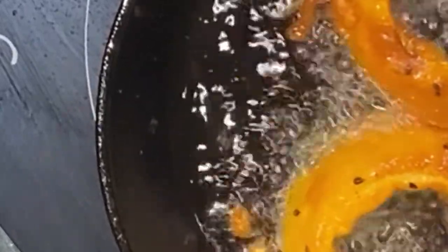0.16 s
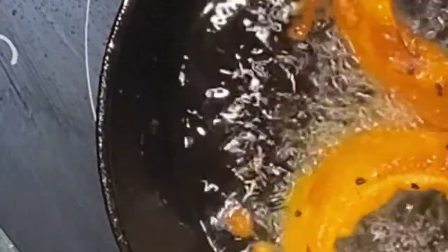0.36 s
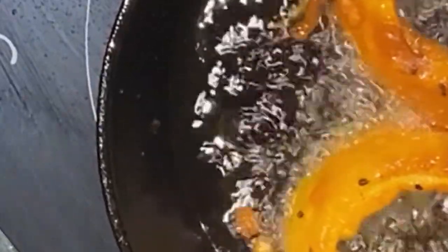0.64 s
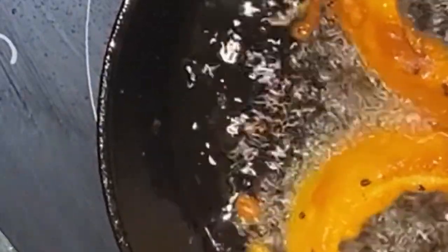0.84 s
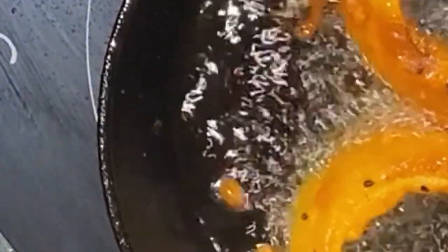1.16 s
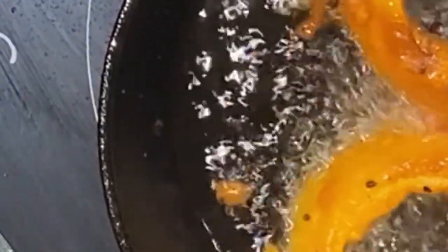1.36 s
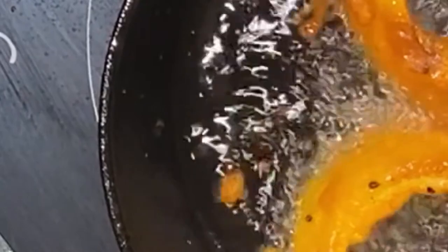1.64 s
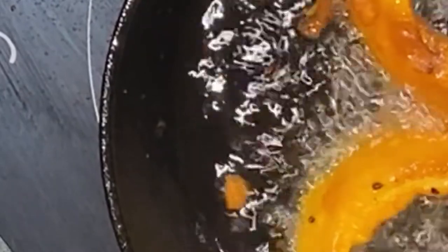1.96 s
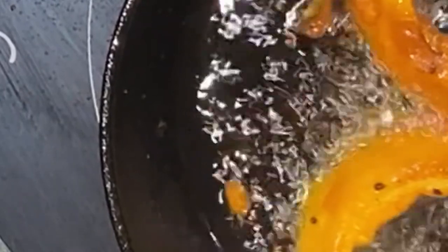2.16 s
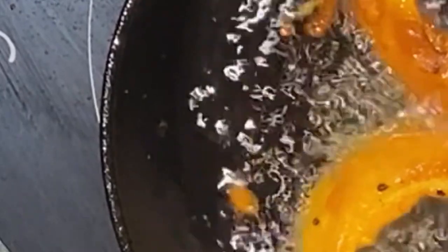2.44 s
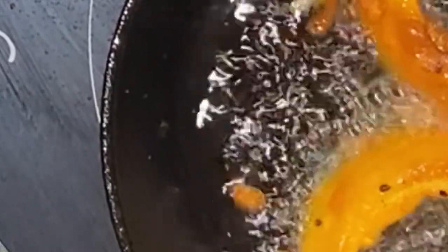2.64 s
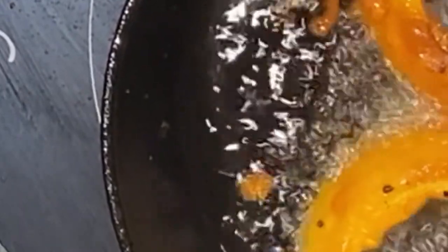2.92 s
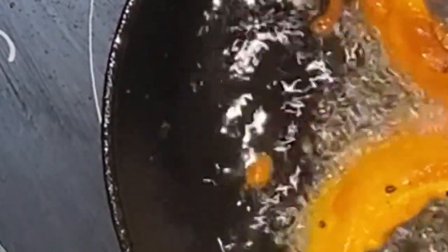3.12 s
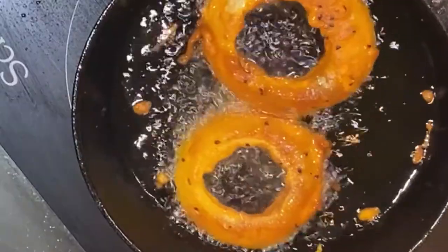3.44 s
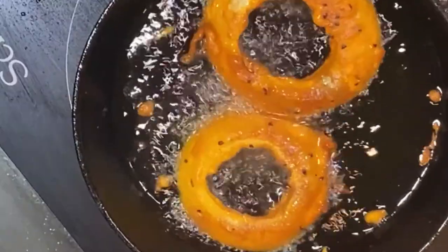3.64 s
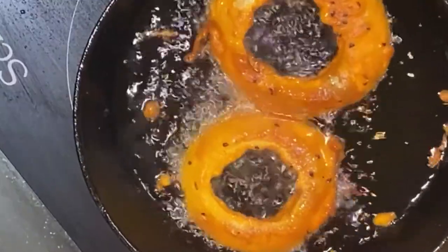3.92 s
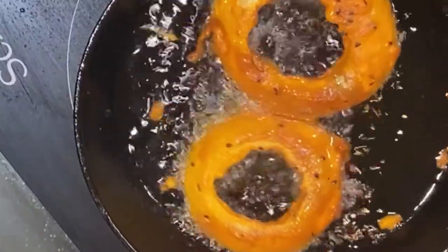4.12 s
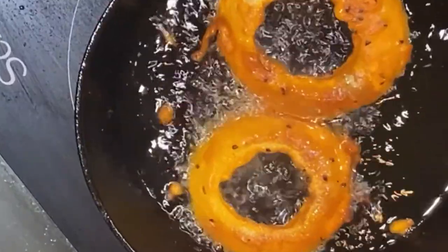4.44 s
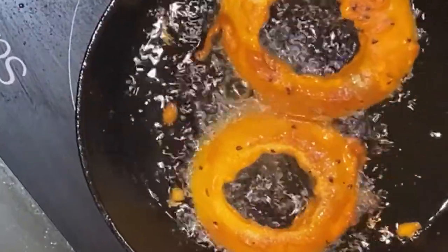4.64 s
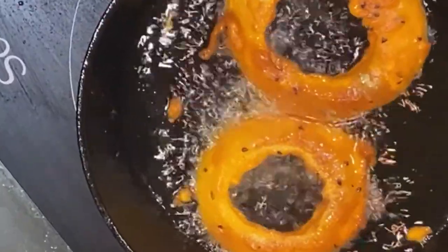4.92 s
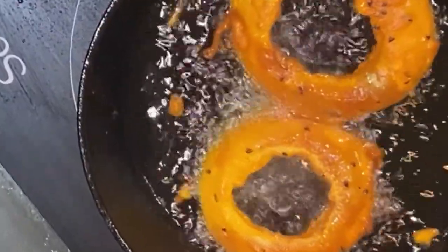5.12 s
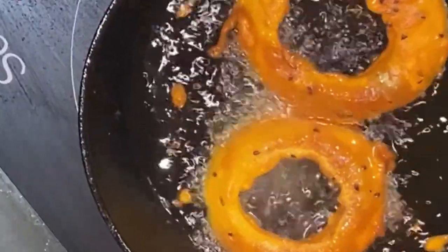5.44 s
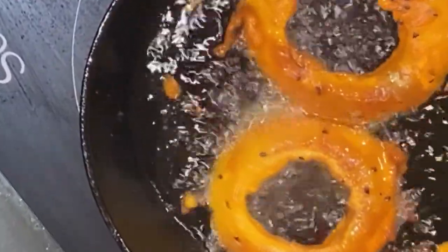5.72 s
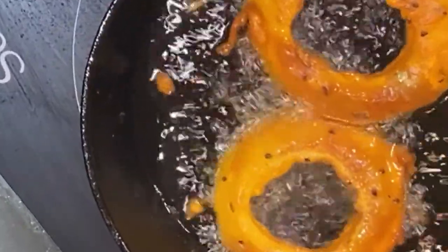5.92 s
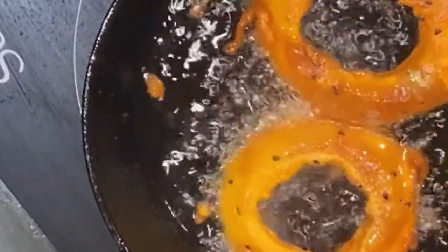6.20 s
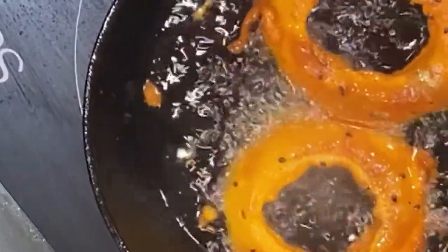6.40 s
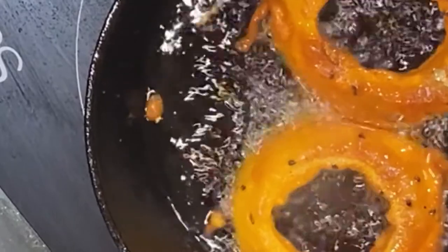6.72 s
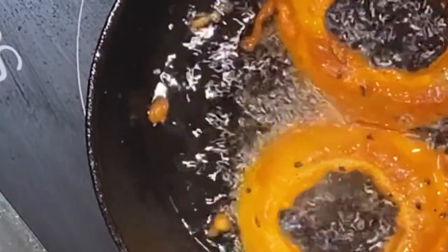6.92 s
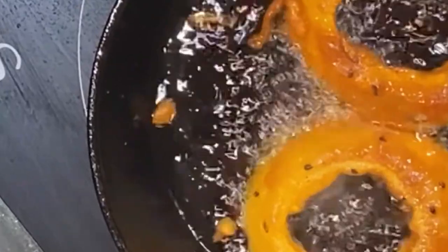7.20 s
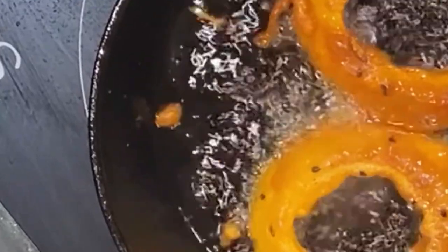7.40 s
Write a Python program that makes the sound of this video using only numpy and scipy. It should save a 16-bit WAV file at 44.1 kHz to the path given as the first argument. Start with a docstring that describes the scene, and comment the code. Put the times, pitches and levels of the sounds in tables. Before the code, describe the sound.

Close-up frying: wet bubble pops and droplet ticks over thin fizz, a violent burst of steam near five seconds, then a lull and thicker sizzle.

```python
"""Battered onion rings frying

Battered onion rings fry in a shallow pan of hot oil, close to a single microphone.
Resonators driven by random clicks and noise make the steam fizz, bubble snaps and short rough tones.
Larger bubbles pop as decaying sines, flung droplets tick as short noise bursts, a small metal utensil
clinks as a set of ringing modes; filtered noise makes the air puffs and, with a sine, the kitchen hum."""
import sys
import numpy as np
from scipy import signal
from scipy.fft import rfft, irfft, next_fast_len
from scipy.io import wavfile

SR = 44100
rng = np.random.default_rng(int(sys.argv[2]) if len(sys.argv) > 2 else 0)


def wrap_up_sound(samples):
    """Save the sound to the file named by the first command line argument, as 16-bit audio."""
    columns = np.atleast_2d(samples).T
    # keep every value between -1 and 1, then stretch to whole-number steps
    tamed = np.clip(columns, -1, 1)
    steps = np.round(tamed * 32767).astype(np.int16)
    wavfile.write(sys.argv[1], SR, steps)


N = 333351

# how steam leaves the batter: (time [s], smooth hiss relative to separate bubbles [dB])
HISS = [(0, -3.5), (3.3, -1), (3.7, 8.5), (4.9, 8), (7.56, 5)]


def from_db(db):
    """Amplitude gain of a level in dB."""
    return 10 ** (np.asarray(db) / 20)


def rms_one(x):
    """Scale to unit rms."""
    return x / np.sqrt(np.mean(x ** 2) + 1e-20)


def hiss_level_db():
    """Hiss relative to separate bubbles, one value per sample."""
    time_s, level_db = np.transpose(HISS)
    return np.interp(np.arange(N) / SR, time_s, level_db)


def at_hz(points, hz):
    """Read a spectrum in dB on a log-frequency axis."""
    point_hz, point_db = np.transpose(points)
    return np.interp(np.log(hz), np.log(point_hz), point_db)


def drift(rate_hz):
    """Slow random wander of unit rms: noise through two equal poles."""
    step = 40   # samples per slow value
    r = np.exp(-2 * np.pi * rate_hz * step / SR)
    noise = rng.standard_normal(N // step + 2002)
    slow = signal.lfilter([1], [1, -2 * r, r * r], noise)[2000:]   # settled part
    return np.interp(np.arange(N) / step, np.arange(len(slow)), rms_one(slow))


def ring(clicks, hz, t60_s):
    """Two-pole resonator: a unit click starts a decaying sine of initial height 1."""
    r = np.exp(-np.log(1000) / (t60_s * SR))
    w = 2 * np.pi * min(hz, SR * .45) / SR
    return signal.lfilter([0, np.sin(w)], [1, -2 * r * np.cos(w), r * r], clicks + 1e-18)


def band_filter(low_hz, high_hz):
    """Second-order Butterworth band-pass design."""
    return signal.butter(2, [low_hz, high_hz], "band", fs=SR, output="sos")


def add(out, start_s, peak_db, sound):
    """Mix a short sound into the track at the given peak."""
    i = round(start_s * SR)
    out[i:i + len(sound)] += (from_db(peak_db) * sound / np.abs(sound).max())[:N - i]


def coloured_noise(spectrum):
    """Steady noise of a given spectrum, unit rms."""
    size = next_fast_len(N)
    hz = np.maximum(np.arange(size // 2 + 1) * SR / size, 1)
    bins = rfft(rng.standard_normal(size)) * from_db(at_hz(spectrum, hz))
    return rms_one(irfft(bins, size)[:N])


def spurts():
    """Steam spurts rise, hold and fall in dB, summed in power: mid, deep, spray and puff control levels [dB]."""
    # (start [s], control level [dB], rise [s], hold [s], deep bubbles relative to level [dB],
    #  fine spray relative to level [dB], air puff control level [dB])
    spurt_rows = [(0.044,-47.5,0.0071,0.083,-19,-4.5,-52.5), (0.195,-43,0.02,0.057,4,-0.5,-51),
                  (.345,-52.5,0.0056,0.22,0,2,-58.5), (0.441,-43.5,0.015,0.032,2,4,-67),
                  (.585,-47.5,0.029,0.019,-1,-2.5,-76), (0.729,-46.5,0.012,0.092,-6,2,-62),
                  (.854,-43.5,0.013,0.0082,-6,-10,-68), (0.918,-43.5,0.041,0.011,1,4,-53),
                  (1.055,-47,0.0078,0.066,2,0,-67), (1.101,-38,0.048,0.0094,3,-1.5,-57),
                  (1.235,-47,0.017,0.1,1,-1,-61), (1.425,-45.5,0.035,0.012,5,2,-59),
                  (1.5,-37.5,0.25,0.011,-35,-6.5,-63), (1.834,-50,0.0099,0.034,-9,6.5,-62),
                  (2.01,-56.5,0.027,0.039,10,9.5,-63), (2.131,-45.5,0.01,0.0064,5.5,1.5,-65),
                  (2.24,-48.5,0.11,0.0076,5,1,-67), (2.373,-35.5,0.0082,0.031,4,-11,-46),
                  (2.45,-45.5,0.058,0.016,3,2.5,-52), (2.638,-45.5,0.02,0.056,0,-0.5,-66),
                  (2.77,-50,0.019,0.09,3,5,-56.5), (2.91,-52.5,.017,0.026,3,2.5,-57),
                  (2.976,-46,0.01,0.1,-6,5.5,-59), (3.1,-48.5,0.022,0.12,2,0.5,-59),
                  (3.385,-45,0.035,0.0082,7,0.5,-75), (3.564,-42.5,0.0029,0.014,6.5,-13,-75),
                  (3.666,-21,0.048,0.012,2,-19,-50), (3.768,-26,0.042,0.12,1.5,-14,-46),
                  (4.195,-56,0.014,.093,3,-2,-59.5), (4.291,-38.5,.011,0.0055,8,0,-50),
                  (4.35,-47,0.022,0.11,1,-1,-60), (4.5,-46,0.024,0.043,6,-6,-73),
                  (4.625,-45.5,0.0084,0.039,-4,-9,-77), (4.767,-25.5,0.042,0.14,-6.5,-11,-49.5),
                  (4.888,-11,0.019,0.069,-20,-2.5,-37), (5.162,-45,0.012,0.0092,7.5,-2.5,-52),
                  (5.349,-55,0.022,0.024,-24,-35,-78), (5.492,-63,0.038,0.028,-6,3,-75),
                  (5.626,-49.5,0.0053,0.005,-8,-4,-69), (5.69,-51,0.0091,0.074,3,-8,-61),
                  (5.82,-30.5,0.026,0.013,1,-7.5,-39), (6.024,-41,0.0063,0.061,-2,-6,-49),
                  (6.17,-51,0.018,0.031,5,-3.5,-56), (6.297,-39.5,0.0087,0.046,10,-2.5,-43),
                  (6.42,-43,0.045,0.027,4,1.5,-49.5), (6.55,-47.5,0.011,0.031,8,-1.5,-51.5),
                  (6.808,-42,0.0022,0.044,10,-11.5,-52.5), (6.898,-35.5,0.12,0.011,-10,3.5,-36.5),
                  (6.962,-32,0.06,0.066,7,1,-39), (7.1,-35,0.02,0.081,-2,2.5,-39.5),
                  (7.23,-41.5,0.0093,0.16,2,1,-47), (7.389,-43,0.038,0.055,4,3,-54)]
    simmer_db, still_air_db = -63, -64   # between spurts
    rise_db = 14.5   # climb during the rise
    fall_db_per_s, fall_gain_per_s, calm_db = 173.5, 2.76, -44   # faster per dB above calm
    spray_falls = 1.215   # fine spray dies this much faster
    power = np.ones((4, N)) * from_db([[simmer_db], [simmer_db], [simmer_db], [still_air_db]]) ** 2
    t = np.arange(SR) / SR
    for start_s, db, rise_s, hold_s, deep_db, spray_db, puff_db in spurt_rows:
        fall = max(fall_db_per_s + fall_gain_per_s * (db - calm_db), 50)
        falls = fall * np.array([[1], [1], [spray_falls], [1]])
        climb_db = -rise_db * np.maximum(1 - t / max(rise_s, .001), 0)
        shape = from_db(climb_db - falls * np.maximum(t - rise_s - hold_s, 0))
        tops = from_db([[db], [db + deep_db], [db + spray_db], [puff_db]])
        i = round(start_s * SR)
        power[:, i:i + SR] += (tops * shape)[:, :N - i] ** 2
    return 10 * np.log10(power)


def fizz(level_db, deep_db, spray_db, count=36):
    """Tiny bubbles burst at random over steam hiss; cascaded resonators swell and die within a few cycles."""
    fizz_spectrum = [(300, -60.5), (624, -2), (885, 0.5), (1340, -1), (2930, 0), (5610, 0), (10000, -7.5),
                     (16000, -25.5)]   # bubble sizes: (frequency [Hz], relative density [dB per Hz])
    bubbles_per_s, size_spread_db = 9000, 4   # nominal rate, all sizes together
    bubble_cycles = 5.6   # t60 of each resonator
    deep_hz, mid_hz, spray_hz = 600, 1870, 6360   # where each control acts fully
    hiss = from_db(hiss_level_db())
    sizes = from_db(size_spread_db * np.minimum(rng.exponential(1, N), 4)) * rng.choice([-1, 1], N)
    chance_of_burst = bubbles_per_s * from_db(3.0 * drift(40)) / SR
    bursts = sizes * (rng.random(N) < chance_of_burst)
    dealt, out = rng.integers(0, count, N), np.zeros(N)
    steam = rng.standard_normal((3, N))   # neighbouring sizes hear unrelated steam
    pitches = np.geomspace(300, 15000, count)
    weights = from_db(at_hz(fizz_spectrum, pitches)) * np.sqrt(pitches)   # wider bands carry more power
    weights /= np.linalg.norm(weights)
    for k, (hz, weight) in enumerate(zip(pitches, weights)):
        deep = np.interp(np.log(hz), np.log([deep_hz, mid_hz]), [1, 0])
        spray = np.interp(np.log(hz), np.log([mid_hz, spray_hz]), [0, 1])
        tilt_db = deep * (deep_db - level_db) + spray * (spray_db - level_db)
        drive = (rms_one(bursts * (dealt == k)) + hiss * steam[k % 3]) / np.sqrt(1 + hiss ** 2)
        t60_s = bubble_cycles / hz
        out += weight * from_db(tilt_db) * rms_one(ring(ring(drive, hz, t60_s), hz, t60_s))
    out = signal.sosfilt(signal.butter(3, 330, "high", fs=SR, output="sos"), out)
    wander_db = 4.44 * drift(47) / np.sqrt(1 + hiss ** 2)   # smaller under strong hiss
    return from_db(level_db - 4.0 + wander_db) * out


def snaps(level_db, per_s=350, snap_db=-6, spread_db=9.5, duller_db=1.0):
    """Middling bubbles snap singly, quieter as hiss grows; each rings all pool pitches at random strengths."""
    snap_hz = [2620, 3500, 4370, 5500, 6460]   # ringing pitches of the oil pool: (frequency [Hz])
    snap_cycles = 20   # t60
    born = np.flatnonzero(rng.random(N) < per_s / SR)
    size_db = 12.0 * np.minimum(rng.exponential(1, len(born)), 2.0)
    rings = np.zeros(N)
    for k, hz in enumerate(snap_hz):
        strength_db = size_db + spread_db * rng.standard_normal(len(born)) - duller_db * k
        clicks = np.zeros(N)
        clicks[born] = from_db(strength_db) * (-1) ** k
        rings += ring(clicks, hz, snap_cycles / hz)
    return from_db(level_db - 2.07 * hiss_level_db() + snap_db) * rms_one(rings)


def pops(cycles=16.3, swell_s=0.00048, sputter_db=-9):
    """A larger bubble swells into a decaying tone, splatters, and smaller ones of like pitch sputter after it."""
    # (time [s], peak of the whole pop [dB], pitch [Hz], splatter relative to tone [dB])
    pop_rows = [(.061, -18, 2660, -14), (.27, -25.5, 2670, -18), (0.613, -28, 2350, -28),
                (0.738, -22.5, 2470, 3), (0.785, -22, 2470, -29), (0.818, -25.5, 2400, -17),
                (0.866, -18.5, 2510, -17), (.929, -16.5, 2460, 3), (.963, -30, 2500, -12),
                (1.021, -25, 2600, 5), (1.063, -17.5, 2970, -6), (1.075, -19.5, 3650, -12),
                (1.103, -24, 2660, -8), (1.147, -20, 2900, -11), (1.18, -20, 2450, 1.5),
                (1.243, -25.5, 2720, -18), (1.323, -29, 3560, -5), (1.37, -27.5, 2800, -22),
                (1.453, -28, 2930, -13), (1.521, -28.5, 2780, -6), (1.572, -25.5, 1940, -12),
                (1.612, -18, 2620, -17), (1.63, -20.5, 2740, -13), (1.67, -24, 2900, -28),
                (1.717, -20, 2600, -25), (1.78, -21, 2400, -19), (1.847, -25.5, 3560, -20),
                (1.905, -24, 2580, 8), (2.024, -29, 2780, 0), (2.144, -25, 2980, -5),
                (2.383, -12.5, 2550, -17), (2.422, -22, 3380, -11), (2.535, -20.5, 3500, -22),
                (2.674, -19, 2750, -16), (2.703, -12.5, 2440, -11), (2.8, -15, 2830, -35),
                (2.851, -29, 5100, -12), (2.871, -29.5, 2850, -16), (2.92, -24.5, 2760, -12),
                (2.984, -17, 2610, 6), (3.031, -17.5, 2700, -9), (3.075, -27, 2660, -20),
                (3.107, -24, 2620, -19), (3.117, -26.5, 5040, -18), (3.155, -22, 2370, 2),
                (3.195, -22, 5200, 6), (3.276, -19, 2780, -35), (3.672, -17.5, 2510, -15),
                (3.692, -27, 2380, -14), (3.703, -14, 2460, -24), (3.715, -10, 2510, -18),
                (3.8, -24, 1740, -2), (3.881, -15.5, 2300, -12), (3.9, -16, 820, -16),
                (3.947, -15.5, 2520, -10), (3.962, -20, 2630, -9), (4.202, -28.5, 2260, -15),
                (4.306, -11.5, 1790, 3.5), (4.778, -24.5, 1420, -20), (4.79, -20.5, 1780, -21),
                (4.807, -16.5, 1280, -3.5), (4.871, -24, 109, -30), (4.902, -4, 1980, -15),
                (5.188, -24, 2760, -2), (5.236, -29.5, 2560, 5), (5.698, -30, 1600, -6),
                (5.836, -22.5, 1930, -10), (5.845, -20.5, 1300, -6), (5.846, -25, 198, -15),
                (6.115, -24, 2700, -22), (6.461, -27, 2190, -15), (6.601, -30.5, 2390, -7),
                (6.82, -28, 3580, 3), (6.974, -10, 2390, 3), (7.014, -19.5, 247, -30),
                (7.016, -14.5, 4560, -15), (7.021, -10.5, 1353, 0), (7.087, -16, 2360, 0),
                (7.145, -16, 1190, 5), (7.171, -27.5, 200, -25), (7.234, -18, 3320, 1.5),
                (7.5, -20.5, 1610, 9)]
    sputter_t60_s, longest_ring_s = 0.078, 0.018   # deep pops die as thumps
    out, t = np.zeros(N), np.arange(round(.15 * SR)) / SR
    chance = rng.standard_normal((len(pop_rows), 2, len(t)))
    splat_band = band_filter(600, 6000)
    fading = from_db(-60 * t / sputter_t60_s)
    for (start_s, db, hz, splat_db), (push, spit) in zip(pop_rows, chance):
        decay = from_db(-60 * t / min(cycles * 2 / hz, longest_ring_s))
        tone = np.sin(2 * np.pi * hz * t) * (1 - np.exp(-t / swell_s)) * decay
        sputter = rms_one(ring(push * np.abs(spit), hz, cycles / hz)) * from_db(sputter_db) * fading
        sputter *= 1 - np.exp(-t / 0.0011)
        splat = rms_one(signal.sosfilt(splat_band, spit)) * (from_db(-60 * t / 0.0056) + 0.032 * fading)
        add(out, start_s, db, tone / np.abs(tone).max() + sputter + from_db(splat_db) * splat)
    return out


def rough_tones(cycles=16.8):
    """Short rough tones: thin steam jets squeak, and the pan body hums low or rings briefly."""
    tone_rows = [(0.925, -29, 3640, 0.056), (1.102, -29.5, 3070, 0.063), (1.237, -24.5, 3220, 0.028),
                 (1.669, -27, 1836, 0.09), (1.67, -27, 2930, 0.081), (3.129, -29, 3660, 0.028),
                 (3.292, -29, 3340, 0.047), (3.7, -29, 427, 0.084), (3.859, -26.5, 429, .11),
                 (3.715, -23, 2480, 0.03), (4.202, -42, 2100, 0.091), (5.705, -48, 1600, 0.082)]   # (time [s], peak [dB], pitch [Hz], length [s])
    out, t = np.zeros(N), np.arange(round(.4 * SR)) / SR
    chance = rng.standard_normal((len(tone_rows), 2, len(t)))
    for (start_s, db, hz, length_s), (noise, grit) in zip(tone_rows, chance):
        envelope = (1 - np.exp(-t / 0.013)) * np.exp(-(t / length_s) ** 3)
        drive = noise * np.abs(grit) * envelope
        add(out, start_s, db, ring(ring(drive, hz, cycles / hz), hz, cycles / hz))
    return out


def ticks(spray_db, low_hz=3500, high_hz=11000, per_s=200, small_db=11.0):
    """Flung droplets land as sharp noise spits; small random ones follow the spray, quieter as hiss grows."""
    tick_rows = [(0.2223, -26), (0.276, -36), (.383, -35), (.43, -35), (0.453, -19), (0.538, -26.5),
                 (0.7377, -24), (.9295, -37), (0.971, -32), (1.011, -32), (1.067, -26), (1.1245, -24),
                 (1.13, -27), (1.138, -26), (1.1653, -16.5), (1.303, -34), (1.4644, -27), (1.549, -32),
                 (2.065, -26), (2.387, -25.5), (2.426, -22.5), (2.485, -39), (2.508, -24.5), (2.771, -31.5),
                 (2.82, -18.5), (2.888, -32), (2.985, -20.5), (3.0003, -24), (3.019, -23.5), (3.057, -21.5),
                 (3.195, -37), (3.279, -23.5), (4.807, -28), (5.18, -46), (6.906, -52), (7.015, -19)]   # (time [s], peak before the pan hollow [dB])
    out, t = np.zeros(N), np.arange(SR // 50) / SR
    band = band_filter(low_hz, high_hz)
    landings = (rng.random(N) < per_s / SR) * rng.standard_normal(N)
    small = landings * from_db(spray_db - 2 * hiss_level_db() + small_db)
    chance = rng.standard_normal((len(tick_rows), len(t)))
    for (start_s, db), spit in zip(tick_rows, chance):
        add(out, start_s, db, signal.sosfilt(band, spit * from_db(-60 * t / 0.0039)))
    return out + signal.sosfilt(band, small + 1e-18)


def clinks():
    """Each utensil touch sets every metal mode ringing with a random strength."""
    clink_rows = [(4.447, -36), (5.268, -58), (5.275, -40.5)]   # touches: (time [s], peak [dB])
    # utensil modes: (frequency [Hz], mean relative level [dB], t60 [s])
    mode_rows = [(5530, -16, .1), (7014, -3, .14), (8362, 0, .09), (11190, -9, .07), (13690, -16, .05),
                 (14640, -21, .05)]
    out, click = np.zeros(N), signal.unit_impulse(SR // 4)
    chance = rng.standard_normal((len(clink_rows), len(mode_rows)))
    for (start_s, db), strengths in zip(clink_rows, chance):
        touch = np.zeros(len(click))
        for (hz, mode_db, t60_s), strength in zip(mode_rows, strengths):
            touch += from_db(mode_db + 2 * strength) * ring(click, hz, t60_s)
        add(out, start_s, db, touch)
    return out


def pan_hollow(x, lift_db=-4):
    """Air modes between the rings and the pan wall: parallel band-pass resonances added to the sound."""
    # (frequency [Hz], width [Hz], level before lift_db [dB])
    hollow_rows = [(1424, 606, 10), (2510, 1700, 12), (6380, 149, 5.5)]
    out = x.copy()
    for hz, width_hz, db in hollow_rows:
        r = np.exp(-np.pi * width_hz / SR)
        zeros = [(1 - r * r) / 2, 0, (r * r - 1) / 2]
        poles = [1, -2 * r * np.cos(2 * np.pi * hz / SR), r * r]
        out += from_db(db + lift_db) * signal.lfilter(zeros, poles, x)
    return out


def pan_echo(x, t60_s=0.078):
    """Pan walls and cooktop smear sound into a short noisy tail of unit energy."""
    t = np.arange(round(.2 * SR)) / SR
    tail = rng.standard_normal(len(t)) * from_db(-60 * t / t60_s) * (t > .002)
    tail = signal.lfilter([.5], [1, -.5], tail)
    return signal.fftconvolve(x, tail / np.sqrt(np.sum(tail ** 2)))[:N]


def puffs(puff_db):
    """Steam spurts push air past the microphone: low, lumpy noise in two bands of equal rms."""
    air = rng.standard_normal((2, N))
    rumble = rms_one(signal.sosfilt(band_filter(30, 135), air[0]))
    flutter = rms_one(signal.sosfilt(band_filter(115, 300), air[1]))
    return from_db(puff_db - 4.5 + 0.9 * drift(18)) * (rumble + flutter)


def kitchen(air_db=-63.5):
    """Room air as coloured noise, with a faint steady appliance tone."""
    air_spectrum = [(15, -34), (25, 24.5), (263, -6), (373, -7), (531, 9), (2000, 3), (2410, -13),
                    (14800, 1.5), (16000, -46.5)]   # kitchen air: (frequency [Hz], relative density [dB per Hz])
    drone_rows = [(376.8, -72)]   # appliance tone: (frequency [Hz], rms level [dB])
    (hz, drone_db), = drone_rows
    drone = np.sqrt(2) * from_db(drone_db) * np.sin(2 * np.pi * hz * np.arange(N) / SR)
    return from_db(air_db) * coloured_noise(air_spectrum) + drone


def scene():
    """Everything in the pan with its echo, over air puffs and the room."""
    level_db, deep_db, spray_db, puff_db = spurts()
    oil = pan_hollow(fizz(level_db, deep_db, spray_db) + ticks(spray_db))
    oil += snaps(level_db) + pops() + rough_tones() + clinks()
    echo = from_db(-13.5) * pan_echo(oil)
    return (oil + echo + puffs(puff_db) + kitchen())[None]


def record(dry):
    """The microphone rolls off gently, peaks beyond full scale clip, and a steep low-pass cuts the top."""
    cutoff_hz = 15750
    duller = signal.sosfilt(signal.butter(1, 11000, fs=SR, output="sos"), dry)
    low_pass = signal.ellip(16, .3, 75, cutoff_hz, fs=SR, output="sos")
    return signal.sosfilt(low_pass, np.clip(duller, -1, 1))


dry = scene()
out = record(dry)
wrap_up_sound(out)
```